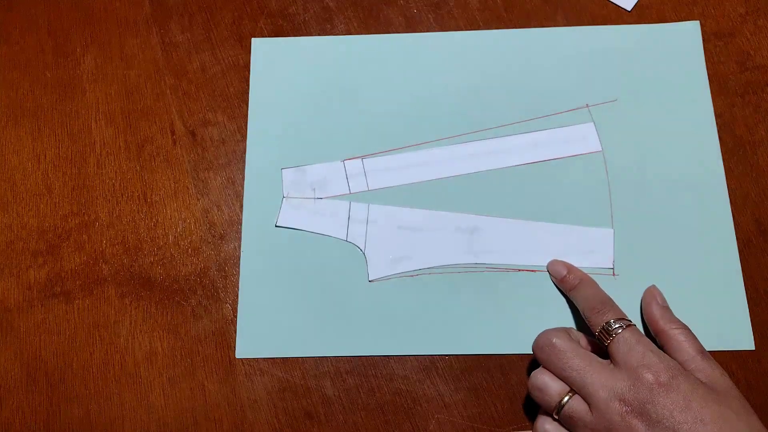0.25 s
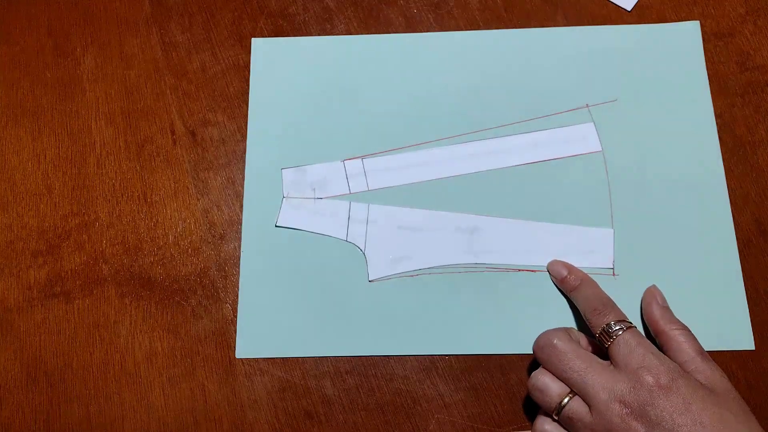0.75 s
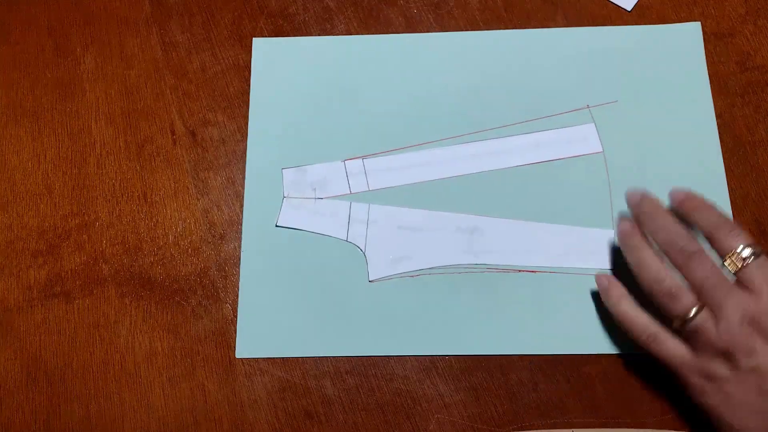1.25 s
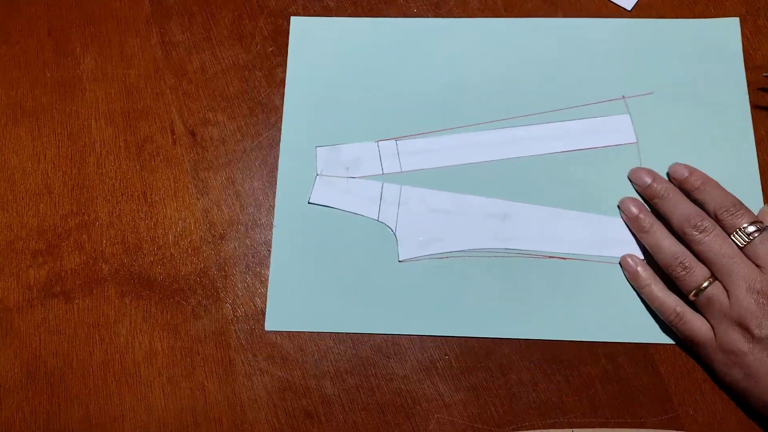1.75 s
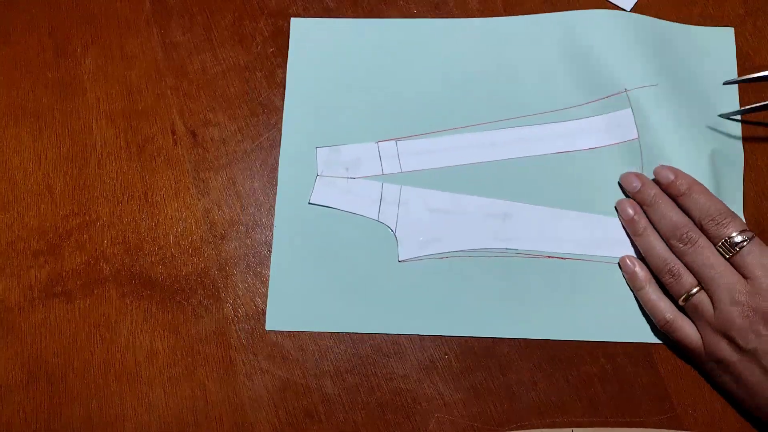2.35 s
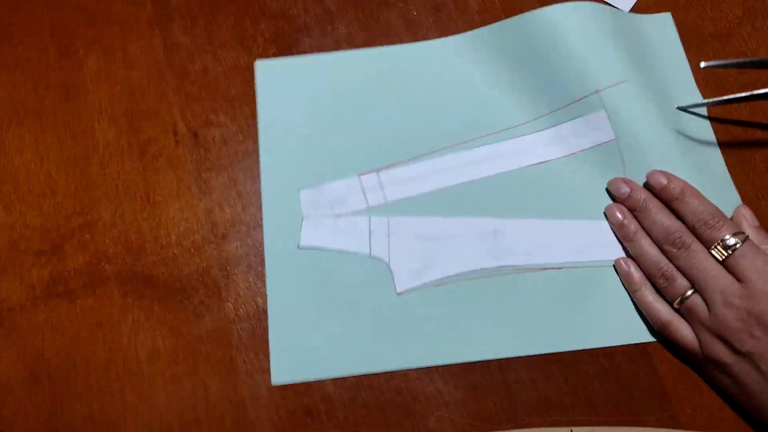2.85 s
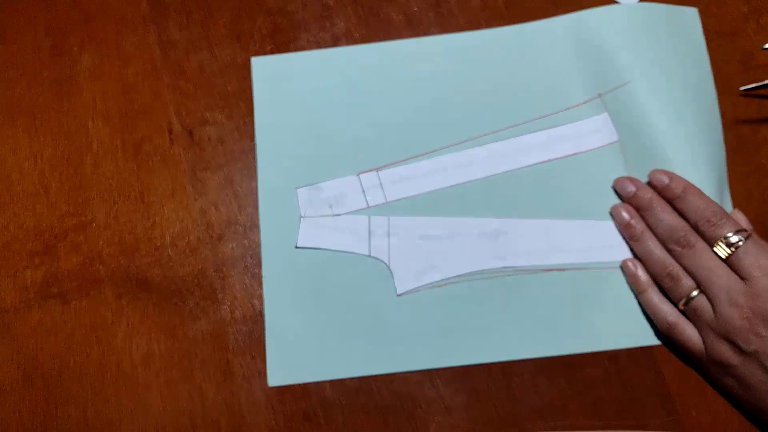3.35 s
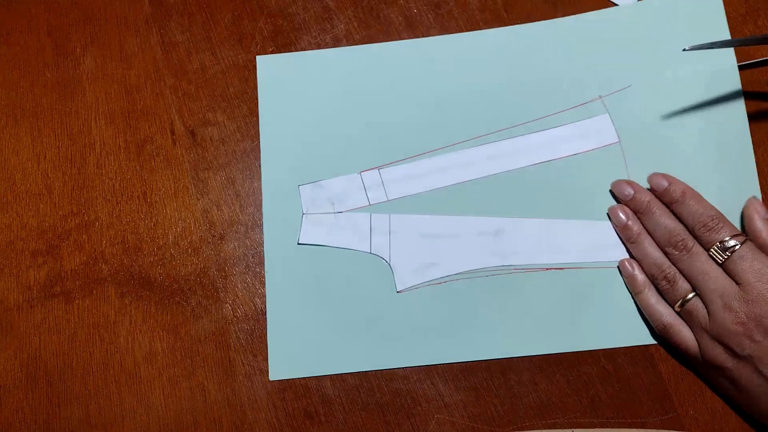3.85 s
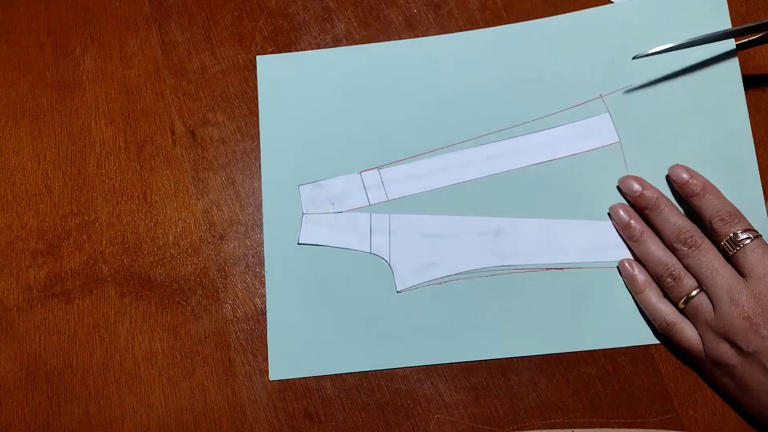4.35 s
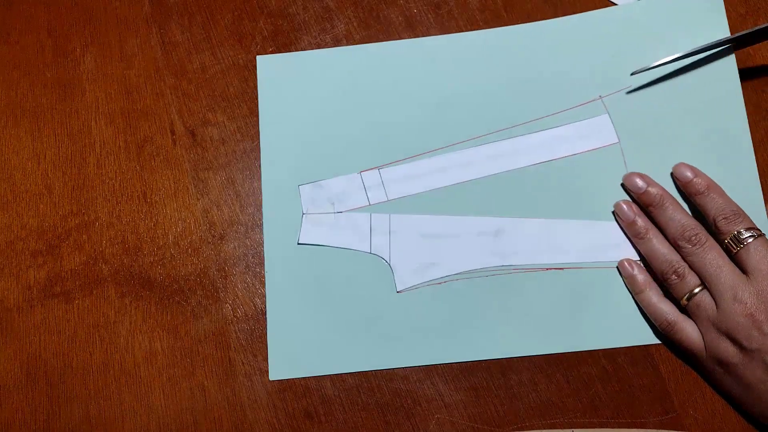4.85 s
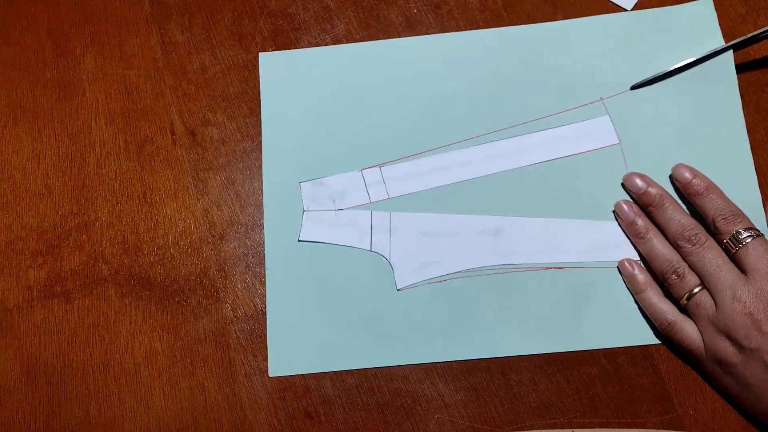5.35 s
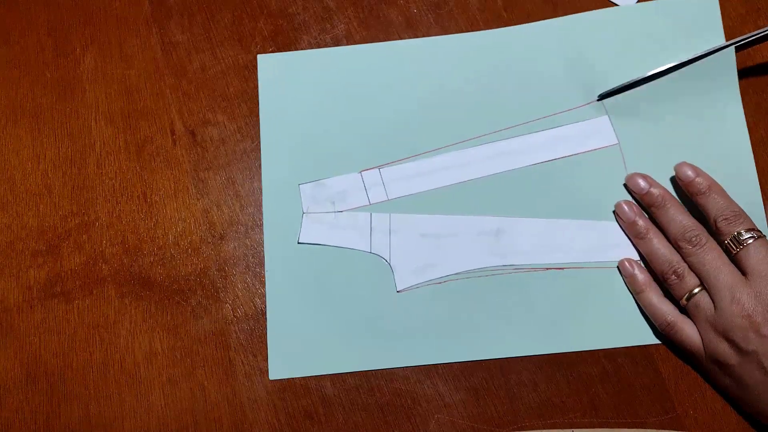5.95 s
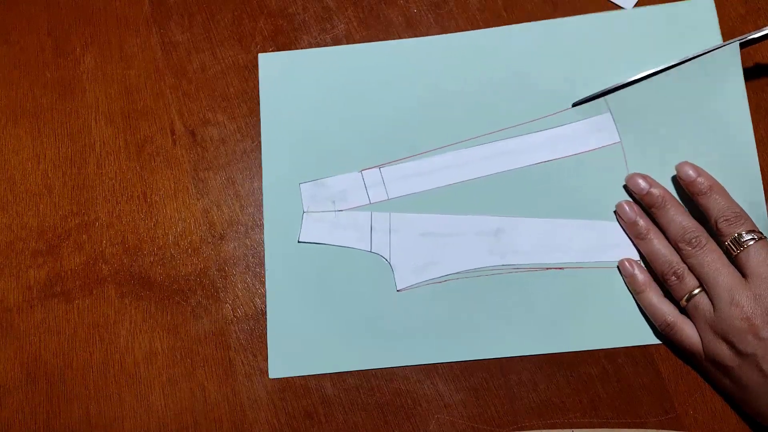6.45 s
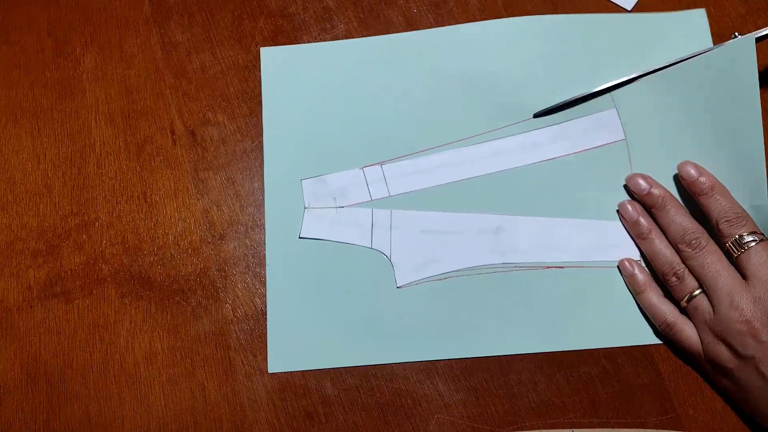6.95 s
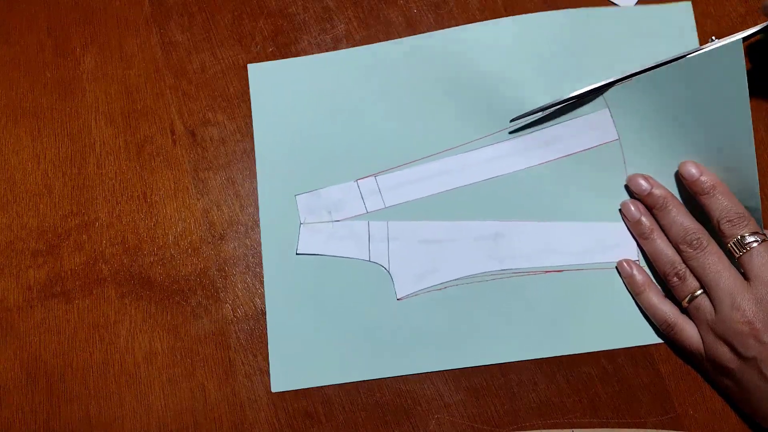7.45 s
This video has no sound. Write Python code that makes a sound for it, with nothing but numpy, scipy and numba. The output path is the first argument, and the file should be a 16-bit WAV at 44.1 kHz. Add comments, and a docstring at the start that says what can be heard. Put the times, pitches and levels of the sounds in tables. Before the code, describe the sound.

Metal clinks, dry paper rustles and flicks, then scissors crunch through stiff paper in separate strokes, blades scraping the wooden tabletop between them.

```python
"""Large scissors cut stiff paper in slow strokes: breaking fibres crackle and shake the sheet (filtered grains).
Between strokes the blades reopen and scrape along a wooden table (grains through the table's resonance).
Lifted paper swishes and buckles, edges snap and tick (noise bursts), the table knocks (filtered impulses).
Scissors rattle and clink as they are picked up (decaying sines); blades squeak and a hand swishes (band noise).
Close stereo pickup in a small, live room with quiet air noise and mains hum."""
import sys
import numpy as np
from scipy import signal
from scipy.fft import rfft, irfft
from scipy.io import wavfile
from numba import njit

SR = 44100
rng = np.random.default_rng(int(sys.argv[2]) if len(sys.argv) > 2 else 0)


def transcribe(u):
    """Save the signal u as a 16-bit wav file named by the first command-line argument.

    u: samples, shape (n,) or (channels, n), limited to [-1, 1]; the rate is SR.
    q: integer samples, one column per channel.
    """
    v = np.clip(np.atleast_2d(u).T, -1, 1)
    q = np.round(v * 32767).astype(np.int16)
    wavfile.write(sys.argv[1], SR, q)


N = 339129
T = np.arange(N) / SR
HZ = np.maximum(np.fft.rfftfreq(SR, 1 / SR), 1)

# Colour of the thudding table top. Each row: frequency in Hz, relative level in dB.
THUD_COLOUR = [(30, -30.5), (90, -20), (140, -7.5), (220, -10), (340, 0), (480, -6.5), (620, -14),
               (800, -15), (1200, -28), (4000, -53), (12000, -73)]
# Colour of single fibres giving way. Each row: frequency in Hz, relative level in dB.
CRINKLE_COLOUR = [(600, -18), (1800, -1), (4000, 0), (9000, -5.5), (14000, -21)]


def undb(db):
    """Decibels to gain."""
    return 10 ** (np.asarray(db) / 20)


def unit(x):
    """Scale to an rms of 1."""
    return x / np.sqrt(np.mean(np.abs(x) ** 2))


def convolved(x, h):
    """Pass sound through impulse responses, one row per port."""
    return signal.fftconvolve(np.atleast_2d(x), np.atleast_2d(h), axes=-1)[:, :N]


def colour(x, points):
    """Minimum-phase filter through (Hz, dB) points that keeps the power of white noise."""
    hz, db = np.transpose(points)
    magnitude = undb(np.interp(np.log(HZ), np.log(hz), db))
    cepstrum = irfft(np.log(magnitude))
    # folding the cepstrum makes the filter causal
    cepstrum[1:len(HZ) - 1] *= 2
    cepstrum[len(HZ):] = 0
    response = unit(np.exp(rfft(cepstrum)))
    return convolved(x, irfft(response)[:SR // 4])


def add(track, s, sound):
    """Mix a short sound in at time s."""
    i = int(s * SR)
    track[..., i:i + sound.shape[-1]] += sound[..., :N - i]


def walk(rate_per_s):
    """Smooth random wandering with an rms of 1, through rate_per_s random points a second."""
    steps = rng.standard_normal(8192)
    return unit(np.interp(T * rate_per_s, np.arange(len(steps)), steps))


@njit
def band(x, hz, width):
    """State-variable band-pass for each row, with a moving centre; the width is a share of the centre."""
    y, g = np.empty(x.shape), np.tan(np.pi * hz / SR)
    for c in range(len(x)):
        b, low = 0., 0.
        for i in range(len(g)):
            v = (b + g[i] * (x[c, i] + 1e-18 - low)) / (1 + g[i] * (g[i] + width))
            b, low, y[c, i] = 2 * v - b, low + 2 * g[i] * v, width * v
    return y


def held(rows, column):
    """A column's value, held through each gesture and gliding to the next."""
    edges_s = [s for row in rows for s in (row[0], row[0] + row[1])]
    return np.interp(T, edges_s, np.repeat([row[column] for row in rows], 2))


def patchy(x, low_hz, high_hz, depth_db, rate_per_s, count):
    """Narrow regions of the spectrum swell and fade on their own as the sheet flexes."""
    for hz in np.geomspace(low_hz, high_hz, count):
        gain = undb(depth_db * np.tanh(walk(rate_per_s)))
        x = x + band(x, np.full(N, hz), 0.21) * (gain - 1)
    return x


def ringing(hits, modes):
    """Each hit (s, dB, pitch ratio) starts decaying sines, the modes (Hz, dB, t60 s)."""
    t, out = T[:SR // 2], np.zeros(N)
    for s, db, pitch in hits:
        for hz, mode_db, t60_s in modes:
            tone = np.sin(2 * np.pi * (hz * pitch * t + rng.random()))
            decay = np.exp(-np.log(1000) * t / t60_s)
            add(out, s, undb(db + mode_db) * tone * decay)
    return out


def grains(rate_per_s, spread_db, catch_db, catch_per_s, channels=1):
    """Uneven impulses, bunched as the contact catches and lets go; signs differ between channels."""
    clicks = np.zeros((2, N))
    hit = rng.random(N) < rate_per_s / SR
    signs = rng.choice([-1, 1], (2, N))[:, hit]
    clicks[:, hit] = signs * undb(spread_db * rng.standard_normal(N)[hit])
    return unit(clicks[:channels] * undb(catch_db * np.tanh(walk(catch_per_s))))


def burst(rise_s, grit_db=3.5):
    """A flurry of uneven micro-fractures that swells and dies, with unit energy."""
    t = T[:SR // 10]
    fractures, sizes = rng.standard_normal((2, len(t)))
    x = fractures * undb(grit_db * sizes) * t * np.exp(-t / rise_s)
    return x / np.linalg.norm(x)


def stroke(s, length_s, crest, swell_db, attack_s, release_s):
    """Gain of one gesture: sets in, swells by swell_db to its crest, eases off and dies away."""
    t, gain = T[:SR] - attack_s, np.zeros(N)
    crest_s = np.clip(crest, .02, .98) * length_s
    swell = np.interp(t, [0, crest_s, length_s], [-1, 0, -1])
    attack = np.clip(t / attack_s + .5, 0, 1)
    release = np.exp(-np.maximum(t - length_s, 0) / release_s)
    add(gain, s - attack_s, attack * release * undb(swell_db * swell))
    return gain


def room_response(early_db=1, early_s=0.0086, port_hz=800):
    """Reflections off table and hands, then walls and standing waves; the ports' bass is alike."""
    # Each row: frequency in Hz, reverberation t60 in s.
    room_decay = [(125, 0.93), (350, 0.42), (700, 0.92), (1400, 0.75), (3000, 0.7), (6000, 0.63),
                  (11000, 0.51), (16000, 0.42)]
    # Standing waves. Each row: frequency in Hz, gain in dB, t60 in s.
    standing = [(81.7, 15, 0.45), (122.3, 16, 0.8), (264.2, 7, 0.54), (363, 3.5, 1), (442, 7.5, 0.67),
                (509, 8.5, 0.71)]
    t = T[:SR]
    alike = np.exp(-(HZ / port_hz) ** 2)
    mid, side = np.exp(2j * np.pi * rng.random((2, len(HZ))))
    field = mid * np.sqrt(1 + alike) + np.array([[1], [-1]]) * side * np.sqrt(1 - alike)
    centres_hz, t60s = np.transpose(room_decay)
    tail = 0
    for share, t60_s in zip(np.eye(len(room_decay)), t60s):
        late = np.exp(-np.log(1000) * t / t60_s)
        early = undb(early_db) * np.exp(-t / early_s)
        tail = tail + irfft(field * np.interp(HZ, centres_hz, share)) * (late + early)
    tail = unit(tail * np.minimum(t / 0.0016, 1)) / np.sqrt(SR)
    for hz, db, t60_s in standing:
        damping = np.log(1000) / t60_s
        mode = np.exp(-damping * t) * np.sin(2 * np.pi * hz * t)
        tail = tail + undb(db) * 2 * damping / SR * mode
    return tail


def place(x, direct_db, room_db, right_db, room_right_db=0.5):
    """Direct sound, 6 samples later on the left and right_db stronger on the right, plus own reflections."""
    h = undb(room_db + np.array([[-1], [1]]) * room_right_db / 2) * room_response()
    h[0, 6] += undb(direct_db - right_db / 2)
    h[1, 0] += undb(direct_db + right_db / 2)
    return convolved(x, h)


def background(side_db=-6, waver_db=0.5):
    """Room air as coloured noise, more alike at both ports in the bass, and a slightly wavering mains hum."""
    # Each row: frequency in Hz, relative level in dB.
    air_colour = [(6, 4), (18, -0.5), (32, -19.5), (55, -5.5), (90, -15), (170, -17), (280, -21),
                  (480, -27), (900, -32.5), (1350, -35), (2700, -41.5), (10000, -39.5), (13000, -40),
                  (15000, -60)]
    # Each row: frequency in Hz, rms level in dB.
    hum_tones = [(59.2, -47.5), (118.4, -57), (177.6, -55), (473.7, -63.5), (570.6, -71), (710.6, -66.5)]
    mid, side = rng.standard_normal((2, N))
    side_gain = np.minimum(undb(side_db) + np.fft.rfftfreq(N, 1 / SR) / 1800, 1)
    side = irfft(rfft(side) * side_gain, N)
    air = unit(colour(mid + np.array([[1], [-1]]) * side, air_colour))
    air = air * undb(-41 + .5 * walk(2.86))
    hum = np.zeros(N)
    for hz, db in hum_tones:
        level = np.sqrt(2) * undb(db + waver_db * walk(3.65))
        hum += level * np.sin(2 * np.pi * (hz * T + rng.random()))
    return air + hum


def rattling():
    """The scissors jostle on the wood as they are grasped and ring with it."""
    # Each row: start in seconds, level in dB, pitch ratio.
    rattles = [(0.334, -38, 1), (0.349, -40.5, 1), (0.371, -43, 1), (0.438, -46, 0.98)]
    # Scissors lying on wood. Each row: frequency in Hz before the pitch ratio, level in dB, t60 in s.
    handle_modes = [(262, -9, 0.4), (502, 4, 0.14), (574, 1.5, 0.4), (814, 2, 0.45), (1115, -11, 0.67),
                    (1320, -2, 0.5), (1460, -4, 0.35), (1580, -9, 0.46), (1860, -12, 0.55),
                    (2067, -6, 0.59), (2180, -5.5, 0.6), (2380, -6, 0.52), (2610, -1, 0.25),
                    (2910, -3, 0.26), (3429, -17, 0.5), (3682, -6, 0.35)]
    return place(ringing(rattles, handle_modes), direct_db=-2.0, room_db=-7.5, right_db=3.0)


def clinking():
    """Taken up, the steel rings on in thin lines, a little lower once the fingers close round it."""
    # Each row: start in seconds, level in dB, pitch ratio.
    clinks = [(0.768, -32, 0.99), (0.992, -36.5, 0.93)]
    # Each row: frequency in Hz before the pitch ratio, level in dB, t60 in s.
    steel_modes = [(950, 3.5, 0.1), (1290, -7, 0.36), (1299, -2, 0.33), (1320, 8, 0.074), (1880, -4, 0.15),
                   (1950, -3, 0.42), (2010, 6, 0.12), (2180, -18, 0.5), (2500, 5, 0.11), (2560, -4.5, 0.18),
                   (2580, 1, 0.18), (2970, -11, 0.2), (3305, -5, 0.19), (3650, -11, 0.25), (4330, -9, 0.15)]
    return place(ringing(clinks, steel_modes), direct_db=-17.5, room_db=-13.0, right_db=10)


def knocking():
    """One push thuds the table top, sets its frame booming and clacks the sheet lying on it."""
    # Each row: start in seconds, thud level in dB, clack and boom relative to the thud in dB.
    knocks = [(0.334, -22.5, -13, -2.5), (0.344, -17.5, -16, 1.5), (0.351, -34, -5, 2),
              (0.363, -22.5, -1.5, -5), (0.68, -41.5, -5, 9.5), (0.767, -38, -3, 3), (1.987, -21, -15.5, 1),
              (2.082, -19.5, -21, -5), (3.571, -15.5, -16, -36), (3.622, -22.5, -16.5, -17),
              (3.95, -10.5, -11, -33), (5.315, -17, -8.5, -8), (5.905, -14.5, -11, -30),
              (5.92, -13.5, -22, -0.5), (6.365, -12.5, -9.5, -15), (6.384, -2, -21, -17),
              (6.936, -10, -13.5, -7), (7.616, -28, -12.5, 5), (7.672, -21, -15, -1)]
    # Each row: frequency in Hz, relative level in dB.
    boom_colour = [(30, -21), (90, -10.5), (170, 7), (230, 3.5), (350, 5), (1000, -50), (6000, -84)]
    # Each row: frequency in Hz, relative level in dB.
    clack_colour = [(300, -4.5), (750, 3), (1300, 1.5), (1950, 2), (2350, -11), (3600, -12.5), (5000, -15),
                    (10000, -25.5)]
    thud, boom, clack = np.zeros((3, N))
    for s, db, clack_db, boom_db in knocks:
        add(thud, s, undb([db]))
        add(boom, s, undb([db + boom_db]))
        add(clack, s, undb([db + clack_db]))
    return (place(colour(thud, THUD_COLOUR), direct_db=13.5, room_db=11, right_db=3.5, room_right_db=2.0)
            + place(colour(boom, boom_colour), direct_db=14, room_db=15.0, right_db=-1)
            + place(colour(clack, clack_colour), direct_db=19.0, room_db=24.5, right_db=1.0))


def buckling():
    """A bend runs through the lifted sheet with a dry flick; its whole colour shifts with the bend's resonance."""
    # Each row: start in seconds, level in dB, resonance of the bend in Hz, rise time in s.
    buckles = [(2.605, -20, 1190, 0.0018), (2.610, -18.5, 1710, 0.0021), (2.782, -30, 1800, 0.0018),
               (2.792, -26, 1760, 0.0025), (2.85, -27, 1650, 0.00067), (2.868, -31, 1700, 0.0014),
               (2.875, -28, 1400, 0.0011), (2.936, -23, 1640, 0.002), (2.945, -25, 1970, 0.0012),
               (2.956, -21.5, 2740, 0.0033), (7.259, -25.5, 1890, 0.0022)]
    # Colour of a bend that resonates at 1696 Hz. Each row: frequency in Hz, relative level in dB.
    flick_colour = [(300, -23), (700, -17), (1100, -6), (1450, 0), (1700, 4.5), (2100, 0.5), (2700, -7.5),
                    (4500, -4.5), (7000, -22), (14000, -28)]
    flicks = np.zeros((1, N))
    for s, db, bend_hz, rise_s in buckles:
        shifted = [(hz * bend_hz / 1696, level_db) for hz, level_db in flick_colour]
        add(flicks, s, colour(undb(db) * burst(rise_s), shifted))
    return place(flicks, direct_db=17.5, room_db=14.0, right_db=3.0)


def ticking():
    """Nails and sheet edges make tiny hard contacts, mostly in the top octave."""
    # Each row: start in seconds, level in dB.
    ticks = [(1.278, -31), (1.284, -31), (1.405, -34), (1.429, -27), (1.435, -29), (2.783, -31),
             (2.851, -23.5), (2.876, -28), (3.9516, -29), (5.4053, -35), (7.26, -33), (7.5378, -39),
             (7.6096, -35)]
    # Each row: frequency in Hz, relative level in dB.
    tick_colour = [(2000, -38), (6000, -12), (8500, 0), (11000, 5), (13000, -11), (16000, -14)]
    contacts = np.zeros((2, N))
    for s, db in ticks:
        add(contacts, s, undb(db) * np.array([burst(rise_s=0.00076) for port in range(2)]))
    return place(colour(contacts, tick_colour), direct_db=15.0, room_db=8.0, right_db=5)


def snapping():
    """Blade and paper edges catch and spring free in short noise bursts; some set a blade ringing."""
    # Each row: start in seconds, level in dB, midrange relative to treble in dB,
    # left minus right in dB ahead of placing, rise time in s.
    snaps = [(0.3333, -28, 8, 0.5, 0.0012), (0.345, -20, -27, -3, 0.001), (0.363, -20.5, -2.5, 0, 0.0009),
             (0.767, -29, -1, -2.5, 0.00048), (1.9862, -22, -4.5, -1, 0.001),
             (3.7724, -9.5, -6.5, -2, 0.00084), (3.7749, -10, -7.5, -8, 0.0015),
             (3.7953, -6.5, -14, -5, 0.00054), (3.798, -10, -14, 3, 0.001),
             (3.8115, -18, -11.5, -12, 0.00067), (5.813, -25, -18, -3, 0.0005),
             (5.8175, -9.5, -16, -4, 0.0006), (5.8206, -11.5, -12, -6, 0.0005),
             (5.8247, -13, -10, 0, 0.00068), (5.835, -9.5, -15, 2, 0.001), (5.848, -8.5, -11, -7, 0.00072),
             (5.862, -11, -11, -5, 0.0013), (5.8727, -18, -12, -1, 0.00036), (5.8872, -21, -14, -2, 0.0004),
             (6.018, -20.5, -6, -4, 0.0008), (6.294, -9, -17, -3, 0.0005), (6.3125, -16, -5, -7, 0.00084),
             (6.3377, -21, -5, -4, 0.0005), (6.351, -18, -2, -4, 0.00043), (6.3638, -21, -3, -1, 0.0008),
             (6.3768, -15, -16, -7, 0.0011), (6.3797, -5, -10.5, -4, 0.0016),
             (6.5097, -15, -17, -4.5, 0.0007), (6.885, -27, 1, -2, 0.00065), (6.911, -21, -5, 2, 0.00091),
             (6.933, -15.5, -17, -9, 0.0011)]
    # Each row: start in seconds, level in dB, pitch ratio.
    blade_rings = [(3.773, -44, 0.92), (3.795, -26.5, 0.96), (5.818, -43, 0.95), (5.848, -46, 1),
                   (6.294, -48, 0.8), (6.381, -47, 0.81)]
    # Each row: frequency in Hz before the pitch ratio, level in dB, t60 in s.
    blade_modes = [(2536, -9, 0.18), (4900, -6, 0.13), (7000, -10, 0.12), (7370, 1, 0.11), (7700, 0, 0.17),
                   (7900, 3, 0.11), (8097, 3, 0.14), (8357, -10, 0.15), (9225, -4, 0.2)]
    # Treble of a snap. Each row: frequency in Hz, relative level in dB.
    snap_colour = [(1500, -23.5), (3200, -1), (5000, -5.5), (7500, -3), (10000, 2.5), (11700, -1.5),
                   (13000, -10.5), (16000, -16)]
    # The paper's answer to a snap. Each row: frequency in Hz, relative level in dB.
    body_colour = [(300, -22), (1000, -7.5), (1800, 1.5), (2600, 1), (3700, 2.5), (4500, -8.5),
                   (8000, -48.5)]
    treble, middle = np.zeros((2, 2, N))
    blade = ringing(blade_rings, blade_modes)
    for s, db, mid_db, pan_db, rise_s in snaps:
        crack = np.array([undb(db + side * pan_db / 2) * burst(rise_s) for side in (1, -1)])
        add(treble, s, crack)
        add(middle, s, crack * undb(mid_db))
    return (place(colour(treble, snap_colour), direct_db=11.0, room_db=7.0, right_db=2.5, room_right_db=-1.5)
            + place(blade, direct_db=-3.0, room_db=-9, right_db=9)
            + place(colour(middle, body_colour), direct_db=14.5, room_db=14.0, right_db=5.5, room_right_db=-3.5))


def swishing_and_squeaking():
    """Blades rub in fits with a narrow squeak; the first, wider row is a hand swishing over paper."""
    # Each row: start in seconds, length in s, centre in Hz, width in Hz, level in dB.
    rubs = [(1.43, 0.1, 5350, 1100, -55.5), (3.175, 0.014, 5030, 900, -48), (3.189, 0.035, 4430, 1000, -49),
            (4.029, 0.12, 3380, 260, -53), (4.117, 0.1, 3300, 260, -48.5)]
    out = np.zeros((2, N))
    for s, length_s, hz, width_hz, db in rubs:
        spectrum = np.exp(-2 * ((HZ - hz) / width_hz) ** 2)
        rub = irfft(rfft(rng.standard_normal((2, SR))) * spectrum)
        swell = np.sin(np.pi * np.minimum(T[:SR] / length_s, 1))
        add(out, s, undb(db) * unit(rub) * swell)
    fits = undb(5.9 * np.tanh(walk(70)))
    return place(out * fits, direct_db=1.0, room_db=-2.0, right_db=5)


def dragging():
    """Blade and hand stick and slip on the wood; the table top murmurs at a pitch that depends on the spot."""
    # Each row: start in seconds, length in s, level in dB, share of the length at which the push peaks,
    # resonance of the table in Hz.
    drags = [(2.087, 0.15, -31, 0.63, 294), (4.098, 0.23, -44, 0.33, 435), (5.474, 0.19, -37, 0.17, 393),
             (5.795, 0.074, -32.5, 0.85, 364), (6.056, 0.17, -33, 0.62, 367),
             (6.576, 0.15, -28.5, 0.42, 384), (6.834, 0.033, -35, 0.72, 332),
             (7.09, 0.18, -35.5, 0.58, 395), (7.534, 0.15, -41.5, 0.7, 270)]
    # Each row: frequency in Hz, relative level in dB.
    scrape_colour = [(60, -23.5), (170, -17), (260, -3.5), (380, -0.5), (550, -6.5), (800, -12.5),
                     (1400, -24), (4000, -39)]
    push = np.zeros(N)
    for s, length_s, db, crest, _ in drags:
        push += undb(db) * stroke(s, length_s, crest, swell_db=7, attack_s=0.013, release_s=0.019)
    slips = grains(rate_per_s=700, spread_db=0.5, catch_db=0.0, catch_per_s=48)
    murmur = colour(push * slips, scrape_colour)
    table_hz = held(drags, 4) * (1 + 0.081 * walk(14))
    murmur = murmur + undb(4.0) * band(murmur, table_hz, 0.19)
    return place(murmur, direct_db=-5, room_db=-8.5, right_db=6.0)


def sliding():
    """Paper rubs over steel and wood: a hiss with a whistling edge, a coarse rustle in the bent sheet's resonance."""
    # Each row: start in seconds, length in s, hiss level in dB, rustle level in dB,
    # share of the length at which the speed peaks, resonance of the bent sheet in Hz,
    # whistle of the paper's edge relative to the hiss in dB.
    slides = [(0.617, 0.033, -50, -59, 0.41, 2000, 0), (0.971, 0.043, -46.5, -39, 0.81, 2100, -9),
              (1.03, 0.047, -50, -55, 0.5, 2000, -7), (1.434, 0.097, -42.5, -60, 0.52, 2000, 0.5),
              (1.608, 0.032, -49, -72, 0.56, 2000, 3), (1.763, 0.15, -60, -59, 1, 2000, -9),
              (2.108, 0.14, -40.5, -42, 0.44, 1560, -10), (2.232, 0.12, -35, -38.5, 0.38, 3200, 2.5),
              (2.399, 0.1, -39.5, -38, 0.75, 1660, -3), (2.702, 0.013, -38, -36, 0.2, 1600, 6),
              (2.72, 0.092, -37, -34, 0.39, 1750, 3), (2.817, 0.11, -38.5, -39.5, 0.47, 1800, 7.5),
              (2.939, 0.016, -25, -39, 0.35, 2420, -3), (3.177, 0.01, -40.5, -78, 0.33, 1460, -4),
              (3.194, 0.066, -41, -46.5, 0.3, 1500, -7), (3.299, 0.23, -44, -47, 0.8, 1410, -7),
              (3.753, 0.014, -36.5, -47, 0.5, 1800, -1), (3.795, 0.062, -30.5, -40.5, 0.1, 2400, -23),
              (4.07, 0.18, -43, -42, 0.64, 1530, -23), (4.297, 0.58, -68, -58, 0.11, 1352, -9),
              (5.469, 0.025, -34, -35, 0.15, 1350, -6), (5.489, 0.23, -40.5, -39, 0.56, 1330, -7),
              (5.81, 0.012, -30, -29, 0.89, 1500, -7), (6.043, 0.22, -33.5, -33.5, 0.69, 1330, -12),
              (6.512, 0.11, -32.5, -38, 0.93, 1250, -3), (6.628, 0.11, -37, -40, 0.45, 1200, -12),
              (7.085, 0.19, -34.5, -35.5, 0.29, 1380, -25), (7.446, 0.075, -47.5, -47.5, 0.12, 1780, -13)]
    # Each row: frequency in Hz, relative level in dB.
    hiss_colour = [(1500, -51), (3200, -6), (5000, -2), (7000, -2), (9800, 1.5), (11500, -2.5), (13000, -5),
                   (16000, -16)]
    # Each row: frequency in Hz, relative level in dB.
    rustle_colour = [(200, -8), (600, -3.5), (1100, -5.5), (1800, -1.5), (2600, -1.5), (4000, -2),
                     (7000, -28)]
    hiss_gain, rustle_gain = np.zeros((2, N))
    for s, length_s, hiss_db, rustle_db, crest, _, _ in slides:
        speed = stroke(s, length_s, crest, swell_db=6, attack_s=0.004, release_s=0.0075)
        hiss_gain += undb(hiss_db) * speed
        rustle_gain += undb(rustle_db) * speed

    fine = grains(rate_per_s=11000, spread_db=3.5, catch_db=2.0, catch_per_s=170, channels=2)
    hiss = colour(hiss_gain * fine, hiss_colour)
    whistle = band(hiss, 9700 * (1 + 0.038 * walk(10)), 0.21)
    hiss = hiss + undb(held(slides, 6)) * whistle
    hiss = patchy(hiss, low_hz=3380, high_hz=11750, depth_db=5.0, rate_per_s=20, count=6)

    coarse = grains(rate_per_s=900, spread_db=4, catch_db=4.5, catch_per_s=80)
    rustle = colour(rustle_gain * coarse, rustle_colour)
    bend_hz = held(slides, 5) * (1 + 0.071 * walk(24))
    rustle = rustle + undb(1.5) * band(rustle, bend_hz, 0.16)
    rustle = patchy(rustle, low_hz=740, high_hz=4170, depth_db=6.5, rate_per_s=28, count=7)
    sparse = grains(rate_per_s=55, spread_db=3, catch_db=2.5, catch_per_s=22)
    rustle = rustle + undb(-4.5) * colour(rustle_gain * sparse, CRINKLE_COLOUR)
    return (place(hiss, direct_db=-2.5, room_db=-7.0, right_db=3.5)
            + place(rustle, direct_db=-7.5, room_db=-7.0, right_db=3.5))


def cutting():
    """Fibres break in bunches and shake sheet and table; the long faint row at 5.35 s is the sheet ringing on
    after the first cut."""
    # Each row: start in seconds, length in s, sheet vibration in dB, crackle relative to it in dB,
    # share of the length at which the level peaks.
    cuts = [(5.057, 0.011, -42, -6, 0.61), (5.073, 0.0093, -35.5, -6, 0.54), (5.101, 0.031, -42, -5, 0.21),
            (5.139, 0.028, -37.5, -5.5, 0.22), (5.185, 0.012, -28.5, -7.5, 0.15),
            (5.204, 0.051, -30, -3.5, 0.56), (5.253, 0.076, -23.5, -10, 0.63),
            (5.35, 0.12, -39.5, -19, 0.3), (5.867, 0.0076, -18, -4, 0.57), (5.88, 0.009, -17.5, -7.5, 0.5),
            (5.896, 0.033, -27.5, -6, 0.56), (6.315, 0.0083, -21.5, -12, 0.33),
            (6.332, 0.024, -19, -12, 0.6), (6.361, 0.01, -15.5, -17, 0.47),
            (6.373, 0.011, -21.5, -5.5, 0.65), (6.859, 0.022, -35, -9, 0.8), (6.875, 0.019, -27, -11, 0.65),
            (6.904, 0.017, -16.5, -14.5, 0.39), (6.93, 0.008, -31, -17, 0.5),
            (7.534, 0.02, -35.5, -5.5, 0.39), (7.562, 0.029, -45.5, -3, 0.35),
            (7.611, 0.012, -30.5, -10.5, 0.21), (7.645, 0.046, -44, 1, 0.57)]
    # The held sheet stiffens and slackens from cut to cut. Each row: time in seconds, pitch ratio.
    sheet_tuning = [(5.3, 0.95), (5.9, 1.0), (6.35, 0.93), (6.92, 1.02), (7.6, 1.02)]
    # Sheet held between the blades. Each row: frequency and width in Hz, both before tuning, level in dB.
    sheet_modes = [(702.7, 10, -1.5), (1080, 33, -5.5), (1350, 55, 2), (1351, 27, -2.5), (1410, 81, -0.5),
                   (1650, 197, -5.5), (1672, 55, -1.5), (2850, 490, -19), (3880, 1060, -23)]
    # Each row: frequency in Hz, relative level in dB.
    fibre_colour = [(500, -11), (2000, -1), (3500, -1), (6500, 1.5), (9200, 10.5), (11200, 8), (13000, 1),
                    (16000, -15)]
    sheet_gain, crackle_gain = np.zeros((2, N))
    for s, length_s, db, crackle_db, crest in cuts:
        level = undb(db) * stroke(s, length_s, crest, swell_db=6.5, attack_s=0.0021, release_s=0.002)
        sheet_gain += level
        crackle_gain += level * undb(crackle_db)
    # the table rumbles with the sheet, but varies less: 0.73 dB per dB
    rumble_gain = undb(-7.5) * sheet_gain ** 0.73
    breaks = grains(rate_per_s=2200, spread_db=3, catch_db=5.5, catch_per_s=260, channels=2)

    tuning = np.interp(T, *np.transpose(sheet_tuning)) * (1 + 0.0077 * walk(25))
    body = np.zeros((2, N))
    for k, (hz, width_hz, db) in enumerate(sheet_modes):
        body += undb(db) * (-1) ** k * band(breaks * sheet_gain, hz * tuning, width_hz / hz)
    sheet = place(body, direct_db=17.5, room_db=18.0, right_db=3, room_right_db=1.0)

    tears = crackle_gain * grains(rate_per_s=170, spread_db=2, catch_db=5.5, catch_per_s=18)
    crunch = place(colour(tears, CRINKLE_COLOUR), direct_db=-3.5, room_db=-4.5, right_db=3.5)
    crackle = place(colour(breaks * crackle_gain, fibre_colour), direct_db=1.5, room_db=-2.0, right_db=4.5)
    rumble = place(colour(breaks[0] * rumble_gain, THUD_COLOUR),
                   direct_db=-5.5, room_db=-3.0, right_db=3.0, room_right_db=2.0)
    return sheet + crackle + crunch + rumble


def scene():
    """Everything happens on one table."""
    handling = rattling() + clinking() + knocking()
    paper = buckling() + ticking() + snapping()
    gestures = swishing_and_squeaking() + dragging() + sliding() + cutting()
    return background() + handling + paper + gestures


def record(dry):
    """The recorder clips at full scale, then cuts the top above 16 kHz."""
    low_pass = signal.ellip(8, .2, 70, 16000, fs=SR, output="sos")
    return signal.sosfilt(low_pass, np.clip(dry, -1, 1))


dry = scene()
out = record(dry)
transcribe(out)
```